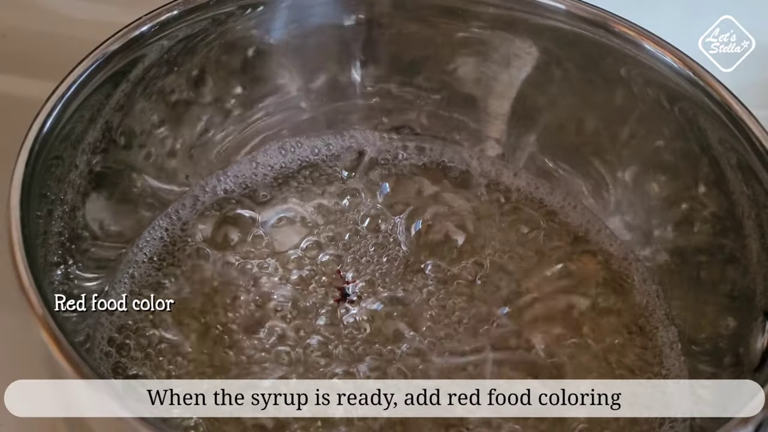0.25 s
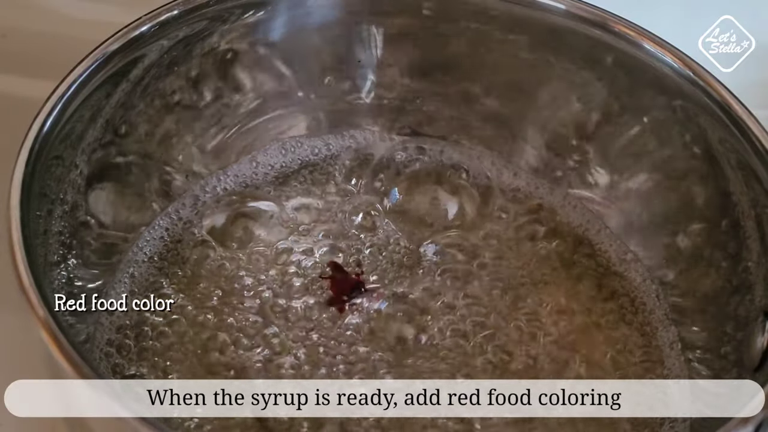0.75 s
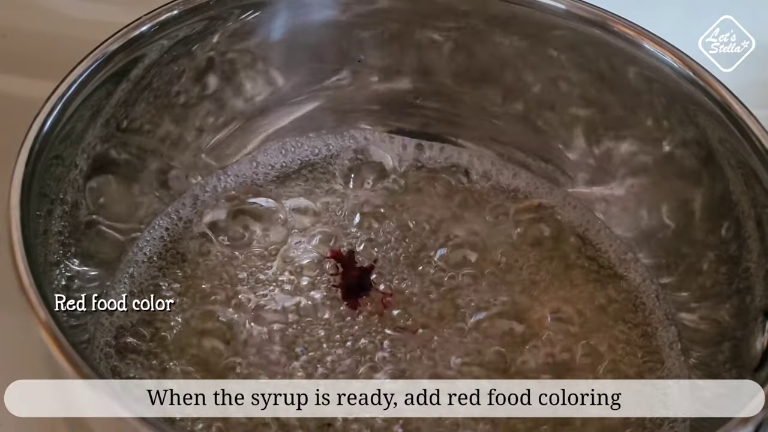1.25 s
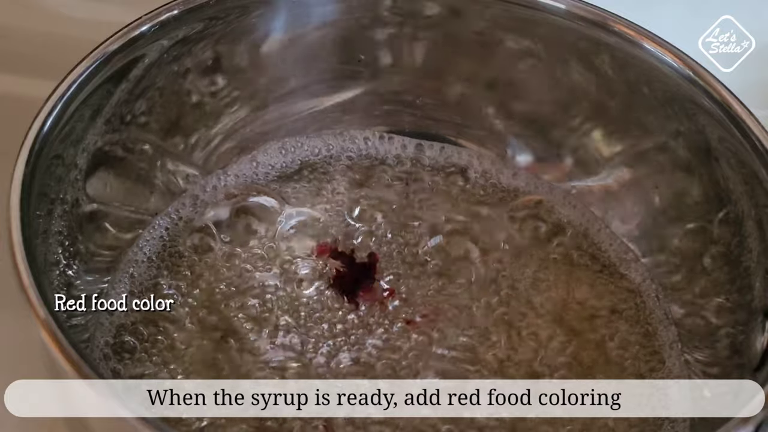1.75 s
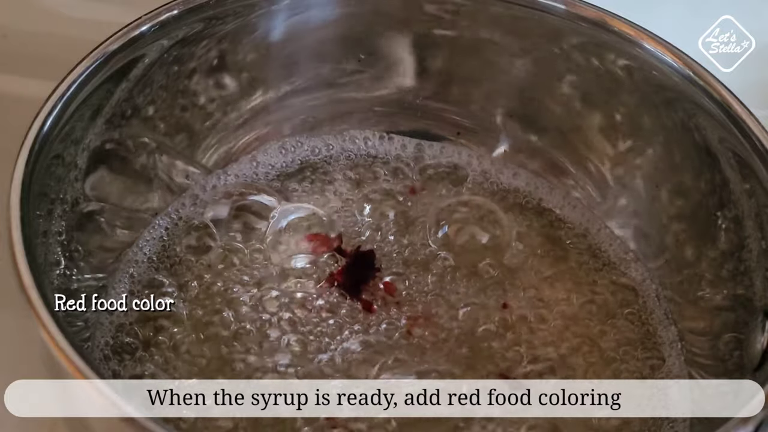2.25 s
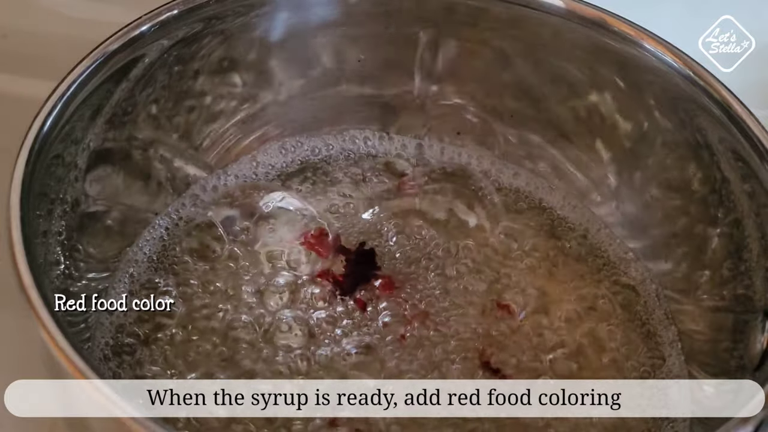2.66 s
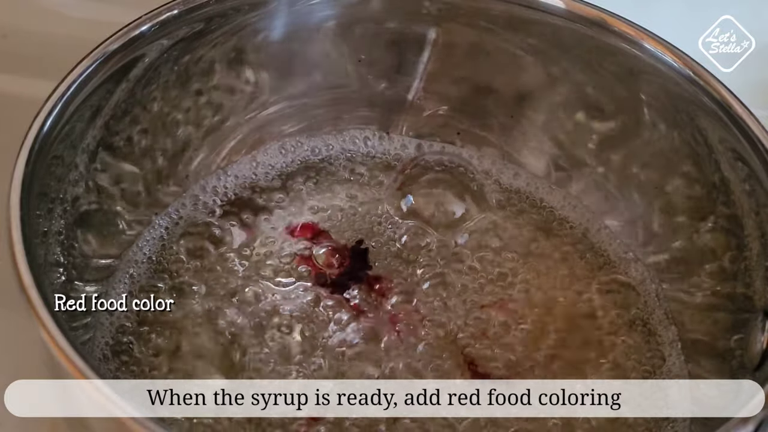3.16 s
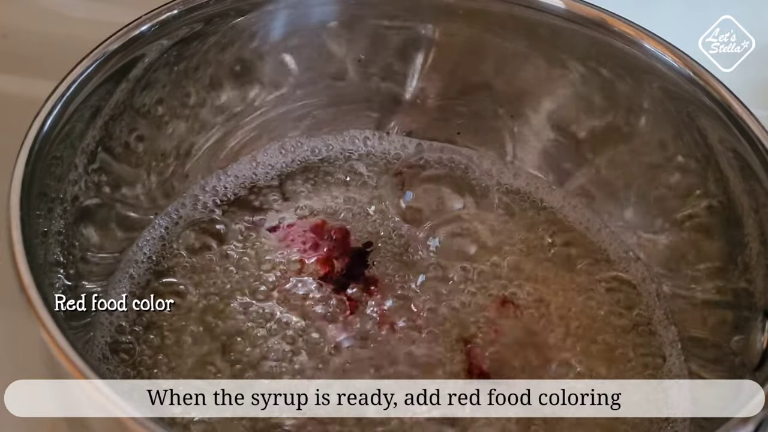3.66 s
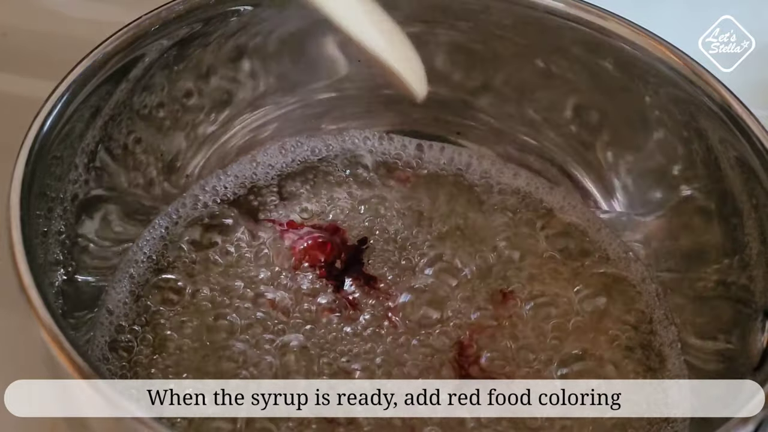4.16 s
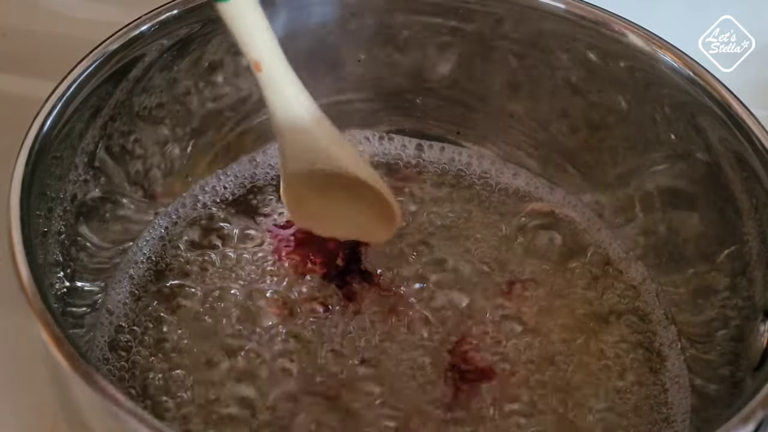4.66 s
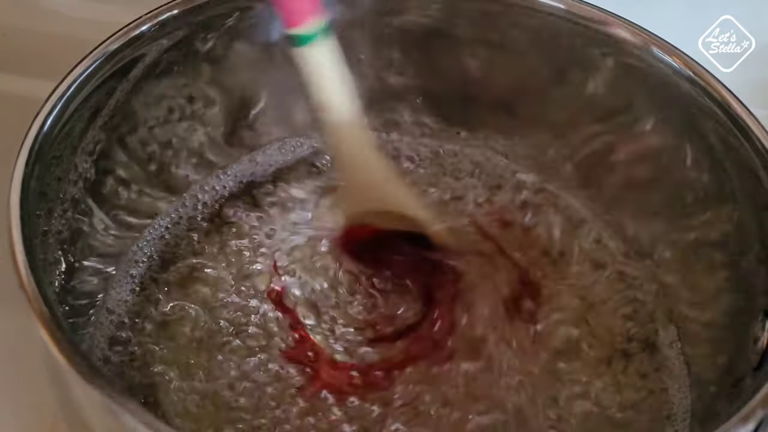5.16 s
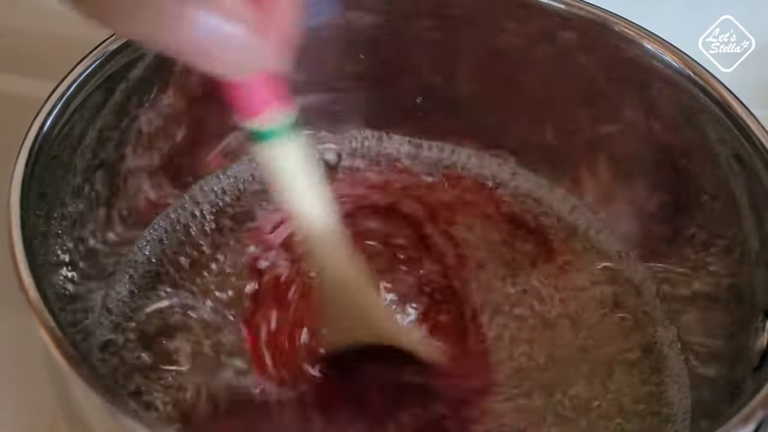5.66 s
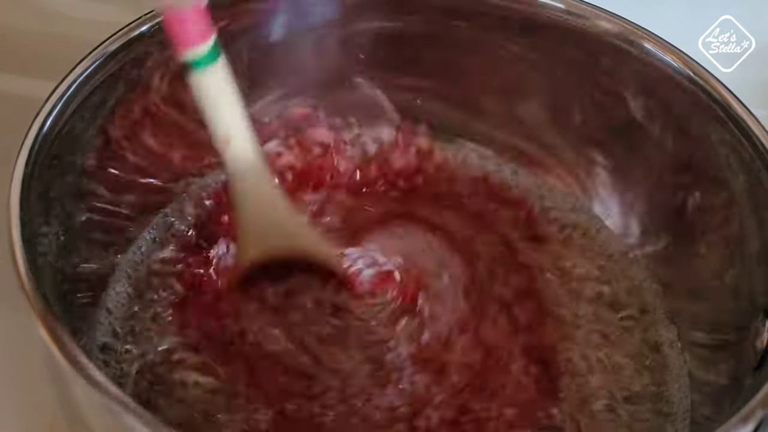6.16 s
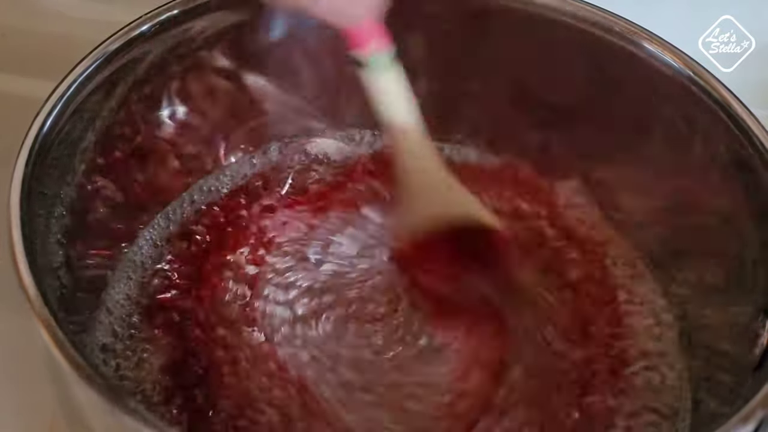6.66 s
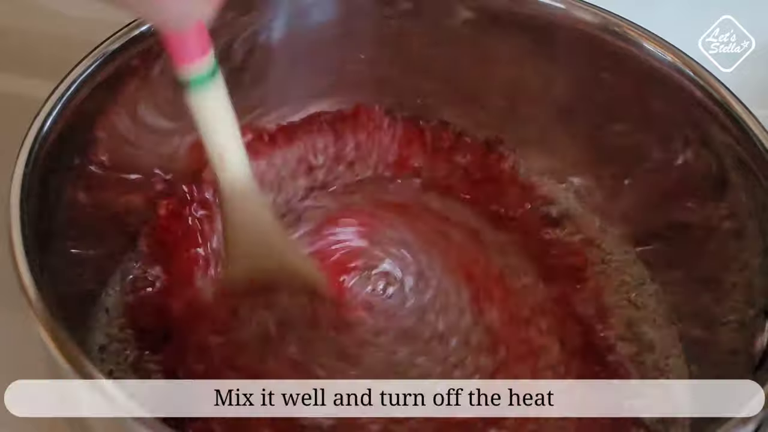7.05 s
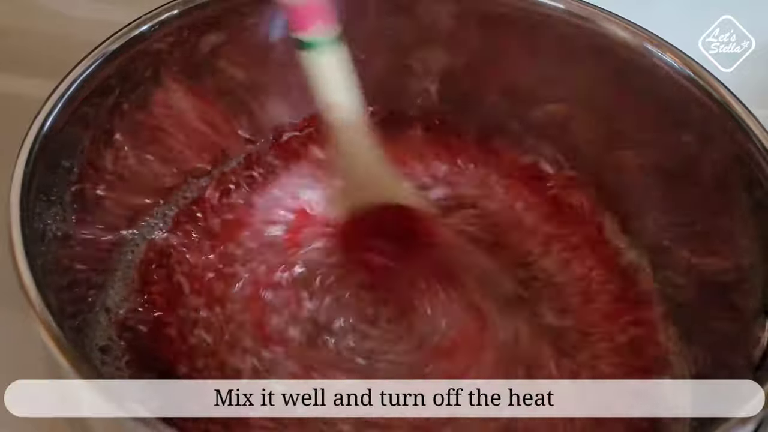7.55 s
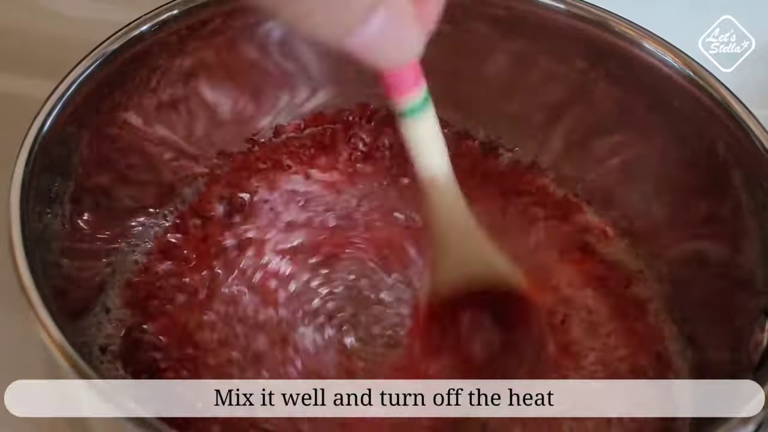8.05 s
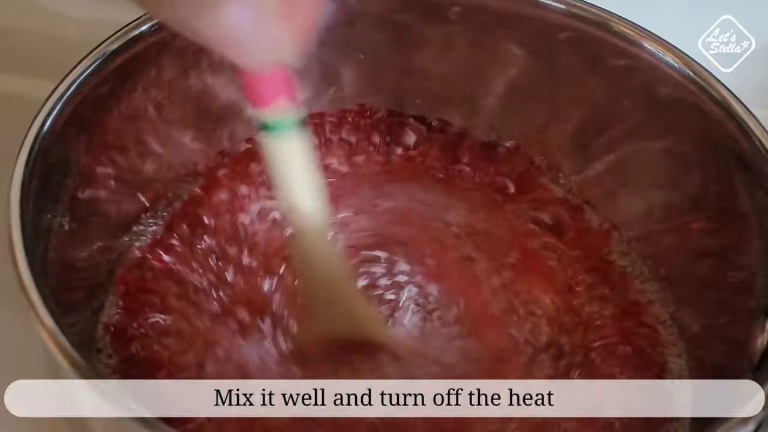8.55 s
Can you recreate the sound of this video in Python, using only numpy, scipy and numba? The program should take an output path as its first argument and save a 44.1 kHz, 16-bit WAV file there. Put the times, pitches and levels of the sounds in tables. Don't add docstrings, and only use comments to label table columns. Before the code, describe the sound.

Quiet sparse bubble ticks in a steel pot, a soft counter thud at three seconds, then wet sizzling gurgle as a spoon stirs.

```python
import sys
import numpy as np
from scipy import signal
from scipy.fft import rfft, irfft
from scipy.io import wavfile
from numba import njit

SR = 44100
rng = np.random.default_rng(int(sys.argv[2]) if len(sys.argv) > 2 else 0)


def to_wav(s):
    ch = np.atleast_2d(s).T
    pcm = np.round(np.clip(ch, -1, 1) * 32767)
    wavfile.write(sys.argv[1], SR, pcm.astype(np.int16))


def decibels_to_gain(level_db):
    exponent = np.asarray(level_db, float) / 20
    return 10 ** exponent


N = 388080

# (time [s], vigour [dB], lean towards fine bubbles [dB])
BOIL_COURSE = [(0.0, -67.5, -3), (0.4, -65.5, -3.5), (0.9, -68.5, -1.5), (2.0, -67.5, 0), (3.5, -66, -2.6),
               (5.1, -67, -0.2), (5.25, -53, 1), (5.7, -47, 3.5), (6.4, -49, 1), (7.5, -49.5, 1.33),
               (8.8, -50, 0.7)]
# (time [s], hum level [dB])
FAN_COURSE = [
    (0.0, -59),
    (2.1, -51),
    (3.01, -49.5),
    (3.11, -40),
    (3.21, -43.5),
    (3.8, -52.5),
    (5.39, -52.5),
    (5.86, -49),
    (7.89, -46),
    (8.8, -50),
]


def syrup():
    return seething() + pot_air(small_pops() + plops() + sloshes())


def seething():
    # (frequency [Hz], density [dB per Hz])
    fizz_sizes = [(4400, 6), (7000, 3.5), (10000, -3), (13500, -2), (17000, 5)]
    tick_sizes = [(1400, -16.5), (4000, -5), (9000, -5), (16500, -6)]
    simmer_sizes = [(1100, -3.5), (2500, -4), (5000, -7)]
    gurgle_sizes = [(220, -1), (500, 0.5), (1200, -3.5)]
    fizz_db, simmer_db, gurgle_db = boil_levels()
    surge = drift(20.0)
    fizz = swarm(fizz_db - 0.3, 2500, 9.3, 0.044, surge, size_db=4.5, clump_db=3.5,
                 pan_db=1.0, echo_db=0.5, colour=fizz_sizes)
    ticks = swarm(fizz_db - 2.5, 150, 15.7, 0.026, surge, size_db=2.0, clump_db=4.0,
                  pan_db=6.0, echo_db=-3.0, colour=tick_sizes)
    simmer = swarm(simmer_db - 0.3, 800, 7.4, 0.081, surge, size_db=2.5, clump_db=3.0,
                   pan_db=2.5, echo_db=-1.0, colour=simmer_sizes)
    gurgle = swarm(gurgle_db - 3.5, 1300, 14.7, 0.14, surge, size_db=2.0, clump_db=3.0,
                   pan_db=2.0, echo_db=-9.0, colour=gurgle_sizes)
    return fizz + ticks + simmer + gurgle


def boil_levels():
    # (time [s], hold [s], lift [dB], lean towards fine bubbles [dB])
    foam_rafts = [(0.38, 0.12, 6, 0.2), (0.632, 0.034, 2.5, 0.5), (0.795, 0.065, 10, 0.2),
                  (0.96, 0.18, 1.5, -2), (1.302, 0.17, 10.5, -1.7), (1.551, 0.1, 9.5, 0.5),
                  (1.743, 0.1, 7.5, -1.5), (1.857, 0.044, 3.5, -3.5), (2.126, 0.12, 11, 4.5),
                  (2.265, 0.15, 8, 1.5), (2.44, 0.24, 6, 3.5), (2.786, 0.015, -1, 13), (2.92, 0.077, 5, 2),
                  (3.508, 0.049, 5.5, -1), (3.623, 0.17, 3, 0.5), (3.77, 0.14, 5, 0.5),
                  (3.881, 0.23, 9.5, 4), (4.23, 0.077, 8, 0), (4.409, 0.14, 6.5, 4),
                  (4.546, 0.07, 4.5, 8.5), (4.63, 0.049, 7.5, 1.5), (4.777, 0.14, 9, 0.8),
                  (5.061, 0.028, 8, 1)]
    # (time [s], hold [s], lift [dB], lean towards fine bubbles [dB])
    spoon_strokes = [(5.185, 0.014, 4, 5.6), (5.32, 0.094, -5, 1), (5.51, 0.11, 2, 0.1),
                     (5.786, 0.07, 2, 1), (5.962, 0.12, 4, 0.4), (6.096, 0.12, 3.5, 0),
                     (6.444, 0.065, 4.5, 0.3), (6.544, 0.21, 1.5, 0.4), (6.776, 0.058, 6, 2.5),
                     (6.97, 0.12, 2, 0.5), (7.09, 0.16, 4.5, -0.6), (7.384, 0.072, 2.5, 0.2),
                     (7.572, 0.094, 4, 0), (7.691, 0.11, 5.5, -1.5), (7.875, 0.055, 3.5, 2),
                     (7.983, 0.081, 2, -2), (8.161, 0.015, 0, -0.5), (8.27, 0.05, 2.5, -2),
                     (8.44, 0.12, 5, 0.5)]
    # (time [s], hold [s], lift [dB], lean [dB])
    spoon_pause = (6.29, .11, -3.5, 2.5)
    rise_s, fall_s, depth = 0.015, 0.039, 0.76
    stirred_db = -52
    vigour, lean = in_time(BOIL_COURSE)
    t, lift, tilt = np.arange(N) / SR, np.zeros(N), np.zeros(N)
    for s, hold, lift_db, lean_db in foam_rafts + spoon_strokes + [spoon_pause]:
        corners = s + np.cumsum([0, rise_s, abs(hold - rise_s), fall_s])
        shape = depth * np.interp(t, corners, [0, 1, 1, 0])
        lift += lift_db * shape
        tilt += lean_db * shape
    coarse = vigour - lean - stirred_db
    fizz_db = vigour + lean + lift + tilt
    simmer_db = stirred_db + 1.02 * coarse + lift - tilt
    gurgle_db = stirred_db + 1.67 * coarse + lift - 1.8 * tilt
    return fizz_db, simmer_db, gurgle_db


def swarm(level_db, per_s, cycles, swell, surge, size_db, clump_db, pan_db, echo_db, colour):
    rate = per_s * decibels_to_gain(clump_db * (0.95 * surge + 0.4 * drift(25.0)))
    born = np.flatnonzero(rng.random(N) < rate / SR)
    pitch, size, place = rng.random((len(born), 3)).T
    lowest, highest = colour[0][0], colour[-1][0]
    hz = lowest * (highest / lowest) ** pitch
    uneven_db = size_db * np.minimum(-np.log(size + 1e-9), 4.0)
    db = uneven_db + at_hz(colour, hz) + 20 * np.log10(hz)
    rings = bursts(born / SR, db, hz, pan_db + 4.2 * (place - 0.5), cycles, 0.25, swell, 1.2e-4,
                   echo_db, t60=0.13, count=5)
    return decibels_to_gain(level_db) * rms_one(pot_air(rings))


def small_pops():
    # (time [s], peak level [dB], ring [Hz], left-right [dB])
    simmer_pops = [(0.5084, -42.5, 8300, 5), (1.1174, -44, 15000, 7.0), (1.3297, -33, 2970, -1),
                   (1.3413, -35, 11900, 3), (1.3818, -42, 2960, 4.5), (1.746, -41, 7900, 2.5),
                   (1.8068, -39.5, 6060, 1.0), (2.0296, -42, 8100, 2.5), (2.3062, -32.5, 8990, -2),
                   (2.38, -42, 7600, 2.0), (2.4972, -42, 15300, 7), (2.6062, -39.5, 4900, 15),
                   (2.6585, -45, 4230, 5), (2.9387, -39, 7000, 4), (2.982, -28.5, 14000, 8),
                   (3.0466, -35.5, 10600, 4), (3.145, -27, 15300, 6), (3.2181, -36, 6900, 1),
                   (3.236, -37.5, 9500, 9), (3.2938, -28.5, 14100, 9), (3.48, -34, 15200, 11),
                   (3.6686, -40, 11400, 8), (3.7905, -37, 15000, 7), (3.8457, -43, 12800, 8),
                   (3.9285, -37, 14900, 0.0), (4.4847, -29, 15300, 10), (4.5344, -34, 12200, 7),
                   (4.5553, -34, 7600, -1), (4.7718, -32.5, 5800, 1), (5.1375, -34.5, 6900, 1)]
    # (time [s], peak level [dB], ring [Hz], left-right [dB])
    stirred_pops = [(5.1853, -38, 10800, 11), (5.3784, -23, 15000, 5), (5.4232, -24, 7950, 1),
                    (5.455, -25.5, 11700, 3.5), (5.5308, -24, 15400, 1.5), (5.61, -19, 12800, 3.0),
                    (5.697, -27, 9650, 10), (5.7237, -22, 9200, 5), (5.803, -23, 11600, -2),
                    (5.867, -24, 12100, -1), (5.9239, -25, 10400, 8), (5.9886, -23.5, 12200, 4),
                    (6.0861, -26, 12200, -3), (6.1126, -22.5, 8200, 4.5), (6.3944, -29.5, 6100, -2),
                    (6.5575, -31, 14700, 10), (6.5914, -26, 11400, 10), (6.942, -31, 11900, 0),
                    (7.0813, -29, 13600, 8), (7.1699, -23, 7900, 6), (7.5025, -29, 8200, 6),
                    (7.5961, -27, 4100, 3.0), (7.6226, -24.5, 14100, 9), (7.727, -29.5, 7600, -2),
                    (8, -27.5, 9700, 2), (8.174, -33, 7900, 3), (8.273, -34, 5140, 4),
                    (8.329, -26.5, 7600, 3), (8.3713, -27, 7600, -16.5), (8.4751, -24.5, 10600, 1.5)]
    # (time [s], peak level [dB], ring [Hz], left-right [dB])
    other_pops = [(1.5579, -46, 3880, 4), (1.9584, -44.5, 7640, 8), (2.4528, -44, 6950, 3.0),
                  (2.5656, -45, 8000, 13), (2.794, -44, 3780, 8), (3.0749, -39, 2800, 3),
                  (3.1916, -38, 6720, -5), (3.3957, -41, 6850, 0), (3.6292, -41.5, 8040, 7),
                  (4.0495, -38, 6060, 2), (4.5855, -37, 14600, 5.5), (4.6757, -38.5, 7900, 6),
                  (4.8315, -40.5, 10900, 11), (4.9038, -45, 6660, -3), (4.9447, -42, 7250, -7),
                  (5.593, -28, 13500, 1), (6.1734, -29, 8100, 2.5), (6.792, -39, 8380, 3),
                  (6.979, -34, 3160, 13), (8.4208, -28, 13600, 2.5)]
    # (time [s], peak level [dB], ring [Hz], left-right [dB])
    more_simmer_pops = [(0.0434, -56.0, 13180.0, 11.0), (0.416, -49.0, 2930.0, 9.0), (0.424, -47, 2760.0, 9.0),
                        (0.4741, -42, 3790.0, 6), (0.583, -51, 6290.0, 6.0), (0.8137, -50, 3620.0, 1),
                        (0.8568, -43, 7150.0, -3.0), (1.0817, -46, 14470.0, 8), (1.3859, -44.0, 10770.0, 12),
                        (1.4232, -44, 3790.0, 9.0), (1.4664, -52.0, 3270.0, 10.0), (1.4865, -52.0, 2930.0, 8.0),
                        (1.6342, -49, 4480.0, 9.0), (1.859, -48, 2840.0, 10), (1.9119, -51, 9650.0, 6.0),
                        (1.9353, -57, 10850.0, 11.0), (1.9523, -56, 11020.0, 9.0),
                        (2.1116, -51.0, 12320.0, 11.0), (2.1379, -50, 10080.0, 7), (2.2759, -43, 3100.0, 9),
                        (2.4627, -47, 10250.0, 13.0), (2.7103, -45, 10340.0, 0.0),
                        (2.7997, -50.0, 11460.0, 9.0), (2.8073, -45, 11710.0, 10.0), (2.8888, -53, 5510.0, 6.0),
                        (3.0804, -33, 5340.0, 4.0), (3.2436, -38, 14380.0, 7.0), (3.7429, -51, 11460.0, 8.0),
                        (3.7751, -48.0, 10680.0, -2.0), (3.98, -45, 3880.0, -4.0), (4.1906, -45, 14900.0, 13),
                        (4.249, -46, 3010.0, 9.0), (4.2816, -46, 6700, -4.0), (4.3578, -50, 4070, 3.0),
                        (4.4344, -45.0, 14900.0, 12), (4.492, -42, 7920.0, 6), (4.5631, -42.0, 12490.0, 11),
                        (4.6077, -46.0, 11800.0, 7.0), (4.7798, -44, 3790.0, -2), (4.8112, -46, 3960.0, 11),
                        (4.8593, -43, 15500.0, 12), (4.9172, -47, 11970.0, 9.0), (5.0122, -49.0, 14640.0, 12.0),
                        (5.0435, -49, 3010.0, 5), (5.0813, -49, 11540.0, 8.0)]
    # (time [s], peak level [dB], ring [Hz], left-right [dB])
    more_stirred_pops = [(5.1897, -34, 10590.0, 9), (5.2038, -37.0, 13520.0, 12.0),
                         (5.217, -39.0, 10510.0, 8.0), (5.2851, -35, 14900.0, 10), (5.3212, -35, 10940.0, 4.0),
                         (5.3278, -33, 13700.0, 8), (5.3501, -41, 5000.0, 3.0), (5.3719, -35, 11970.0, 6.0),
                         (5.392, -26, 14990.0, 3.0), (5.4443, -29, 15330.0, 10), (5.474, -34.0, 13700.0, 8.0),
                         (5.496, -33.0, 14560.0, 0.0), (5.7347, -28.0, 12830.0, -5.0),
                         (5.9983, -24, 12400.0, 6.0), (6.0199, -28.0, 10590.0, -2.0),
                         (6.0768, -29, 11710.0, -6.0), (6.2206, -32.0, 13950.0, 10.0),
                         (6.2862, -33, 7150.0, -7.0), (6.2975, -29, 14300.0, -6.0), (6.311, -33, 10800, 13.0),
                         (6.4031, -37.0, 5770.0, 4.0), (6.477, -28.5, 11200, 8), (6.5661, -31.0, 13950.0, 12.0),
                         (6.6095, -29, 15070.0, 10), (6.7006, -31, 3190.0, 5), (6.8966, -31, 14990.0, 10.0),
                         (6.9086, -34.0, 12830.0, 5.0), (6.9552, -34.0, 11890.0, 9.0),
                         (7.2672, -31, 15420.0, 9.0), (7.3071, -34.0, 14990.0, 11.0),
                         (7.3465, -36.0, 12230.0, 8.0), (7.5326, -37, 4570.0, 10), (7.6418, -31, 5170.0, 5.0),
                         (7.6538, -31, 12660.0, 5.0), (7.794, -29.0, 14210.0, 7), (7.918, -33.0, 7750.0, 2.0),
                         (7.963, -33, 4480.0, 1.0), (7.969, -31, 11200.0, 5), (8.0461, -37.0, 11710.0, 6.0),
                         (8.1117, -36, 9130.0, 5.0), (8.1561, -42, 8270.0, 7.0), (8.2962, -36.0, 14990.0, 4.0),
                         (8.3133, -36.0, 7840.0, 5), (8.3214, -36, 3600, 5.0), (8.3558, -38, 12920.0, 8.0)]
    every_one = simmer_pops + stirred_pops + other_pops + more_simmer_pops + more_stirred_pops
    s, db, hz, pan_db = np.transpose(every_one)
    echo_t60_s, echo_reach_s = 0.024, 0.009
    pops = bursts(s + 6e-4, db + 13.0, hz, pan_db, 11.2 * np.sqrt(hz / 9000), 0.035, 0.2, 4e-5,
                  echo_db=-7.5, t60=echo_t60_s, count=16, reach_s=echo_reach_s)
    snaps = bursts(s + 0.0007, db + 3.0, hz * 0.76, pan_db, 4.3, 0.036, 0.054, 4e-5,
                   echo_db=-4.5, t60=echo_t60_s, count=10, reach_s=echo_reach_s)
    return pops + snaps


def plops():
    # (time [s], peak level [dB], ring [Hz])
    large_bubbles = [(0.806, -47, 1410), (1.329, -37, 1490), (2.306, -32.5, 2700), (4.009, -46, 720),
                     (5.112, -39, 1370), (5.383, -43, 730), (5.536, -41, 681), (5.588, -41, 789),
                     (5.628, -37, 773), (5.909, -35, 678), (5.886, -32.5, 1390), (5.965, -29, 720),
                     (5.992, -43, 470), (6.139, -38, 759), (6.226, -28, 1380), (6.285, -32, 1600),
                     (6.445, -47, 796), (6.499, -41, 799), (6.799, -37, 735), (6.847, -40, 697),
                     (7.043, -39, 1670), (7.089, -38, 736), (6.978, -51, 708), (7.169, -35.5, 480),
                     (7.17, -28, 850), (7.336, -43, 1620), (7.449, -41, 705), (7.585, -38, 430),
                     (7.709, -39, 770), (7.755, -34.5, 845), (7.722, -32.5, 720), (7.812, -40, 775),
                     (7.935, -44, 568), (7.998, -34, 740), (8.1, -44, 750), (8.036, -36, 570),
                     (8.154, -41, 493), (8.32, -40, 825), (8.273, -41, 729), (8.508, -45, 708),
                     (8.72, -44, 690)]
    s, db, hz = np.transpose(large_bubbles)
    return bursts(s + 0.00066, db + 10.5, hz, 5.5, 4.05, 0.02, 0.2, 4e-5, echo_db=-9, t60=0.11)


def sloshes():
    # (time [s], peak level [dB], ring [Hz])
    hollows = [
        (5.713, -44, 205),
        (5.885, -40, 214),
        (6.081, -42.5, 228),
        (7.209, -48, 196),
        (7.248, -43, 244),
        (7.601, -36, 430),
        (7.645, -45, 556),
        (8.028, -41, 216),
    ]
    s, db, hz = np.transpose(hollows)
    return bursts(s, db + 9.5, hz, 2.5, 8.2, 0.13, 0.15, 4e-5, echo_db=-6.5, t60=0.22)


def bursts(s, db, hz, pan_db, cycles, rise, swell, spread_s, echo_db, t60, count=8, reach_s=0.025):
    chance, out = rng.standard_normal((len(s), 2)), np.zeros((2, N))
    lead = 1.1e-4 + spread_s * chance[:, 0]
    late = rng.random((len(s), 2, count + 1)) ** 1.5 * reach_s + 6e-4
    late[:, :, 0] = 0
    gain = decibels_to_gain(echo_db - 60 * late / t60) * rng.choice([-1, 1], late.shape)
    gain[:, :, 0] = 1
    turn = np.repeat(2 * np.pi * hz / SR, count + 1)
    length = np.repeat(cycles * decibels_to_gain(1.83 * chance[:, 1]), count + 1)
    for side, sign in enumerate((1, -1)):
        arrival = (s - sign * lead / 2)[:, None] + late[:, side]
        at = np.round(arrival * SR).clip(0, N - 1).astype(np.int64)
        height = decibels_to_gain(db + sign * pan_db / 2)[:, None] * gain[:, side]
        add(out[side], at.ravel(), height.ravel(), turn, length, rise, swell)
    return out


@njit
def add(out, at, height, turn, cycles, rise, swell):
    for k in range(len(at)):
        life = cycles[k] * 2 * np.pi / turn[k]
        for i in range(min(int(life), len(out) - at[k])):
            u = i / life
            shape = np.exp(-6.9 * u) * (1 - np.exp(-u / swell))
            out[at[k] + i] += height[k] * shape * np.sin(turn[k] * i * (1 + rise * u))


def pot_air(x):
    # (frequency [Hz], width [Hz], lift [dB])
    air_modes = [(594, 31, 3.5), (771, 150, 7), (1505, 190, 7.5), (2113, 235, 4.5), (2530, 260, -2),
                 (3043, 210, 5), (3470, 140, -4), (3877, 215, 4.5), (7600, 1260, 3), (11600, 3300, 5)]
    hz = np.arange(N // 2 + 1) * SR / N
    response = 1
    for top, width, db in air_modes:
        detuning = (hz - top ** 2 / (hz + 1e-9)) / width
        response = response + (decibels_to_gain(db) - 1) / (1 + 1j * detuning)
    return irfft(rfft(x) * response, N)


def whistle():
    # (time [s], half length [s], frequency [Hz], level [dB])
    steam_jet = (2.185, .035, 7950, -61.0)
    s, half, hz, db = steam_jet
    shape = np.exp(-((np.arange(N) / SR - s) / half) ** 4)
    return decibels_to_gain(db) * shape * rms_one(band(rng.standard_normal((2, N)), hz - 200, hz + 200))


def thud():
    # (time [s], peak level [dB])
    blows = [
        (3.067, -16),
        (3.185, -30),
    ]
    # (frequency [Hz], at the blow [dB], at the rebound [dB], T60 [s], swell [s])
    counter_modes = [(135.4, -11, -17, 0.24, 0.012), (223.6, -15, -15, 0.47, 0.032),
                     (277, 8, -11, 0.072, 0.015), (294, -16, 6.5, 0.13, 0.011), (535, 1.5, -1, 0.13, 0.064),
                     (682, -15, -12, 0.096, 0.02), (812, -13, -4, 0.078, 0.021),
                     (1250, -24, -25, 0.093, 0.01), (1410, -22, -20, 0.093, 0.0069),
                     (1660, -22, -23, 0.074, 0.007)]
    # (frequency [Hz], density [dB per Hz], T60 [s])
    room_tail = [(60.5, -8.5, 1), (160, 2, 0.66), (270, 0, 0.64), (547, -10.5, 0.66), (1300, -22.5, 0.7),
                 (2300, -25.5, 0.48), (3500, -32, 0.5), (15000, -29, 0.18)]
    t, direct, tail = np.arange(N) / SR, 0, 0
    for k, (s, db) in enumerate(blows):
        since = np.maximum(t - s, 0)
        for hz, *strength_db, t60, swell in counter_modes:
            shape = decibels_to_gain(db + strength_db[k] - 60 * since / t60) * (1 - np.exp(-since / swell))
            direct = direct + shape * np.sin(2 * np.pi * hz * since)
    since = np.maximum(t - blows[0][0], 0)
    for hz, noise in noise_bands(55.2, count=17):
        decay_db = 60 * since / at_hz(room_tail, hz, axis=2)
        lumps_db = 2.7 * drift(26.0)
        tail = tail + decibels_to_gain(at_hz(room_tail, hz) - decay_db + lumps_db) * noise
    tail = decibels_to_gain(-14.0) * tail * (1 - np.exp(-since / 0.0031))
    return (direct + tail) * decibels_to_gain(np.array([[1.3], [-1.3]]))


def fan():
    # (multiple of the hum, level [dB])
    orders = [(1, 0.5), (2, -14.5), (3, -19)]
    # (frequency [Hz], density [dB per Hz])
    rumble_colour = [(13, -47), (22, -18), (81, 0.5), (130, -8.5), (185, -13.5), (240, -9.5), (550, -40),
                     (1100, -120)]
    hum_db, = in_time(FAN_COURSE)
    vigour, _ = in_time(BOIL_COURSE)
    rumble_db = -56.5 + 0.39 * (hum_db + 49.5) + 0.11 * (vigour + 60)
    rotation_hz = 75.1 + 0.378 * drift(2.96)
    phase = 2 * np.pi * np.cumsum(rotation_hz) / SR
    ear_phase = np.array([[0.12], [-0.12]])
    hum = sum(decibels_to_gain(db + 0.84 * k * drift(2.9)) * np.sin(k * phase + ear_phase) for k, db in orders)
    rumble = sum(decibels_to_gain(at_hz(rumble_colour, hz)) * noise for hz, noise in noise_bands(19.64, count=10))
    rumble = decibels_to_gain(rumble_db + 0.5) * rms_one(rumble) * decibels_to_gain(np.array([[0.3], [-0.3]]))
    return np.sqrt(2) * decibels_to_gain(hum_db) * hum + rumble


def hiss():
    # (frequency [Hz], density [dB per Hz])
    hiss_colour = [(350, 4), (1000, 1.5), (2500, -4), (5000, -5), (9000, -2.5), (16000, -12)]
    mixed = 0
    for hz, noise in noise_bands(360, count=11):
        flicker_db = 4.5 * drift(9.4)
        mixed = mixed + decibels_to_gain(at_hz(hiss_colour, hz) + flicker_db) * noise
    return decibels_to_gain(in_time(FAN_COURSE)[0] - 16.0) * rms_one(pot_air(mixed))


def noise_bands(low_hz, count):
    # (frequency [Hz], left-right likeness [-1 to 1])
    likeness = [(60, 1), (250, 0.67), (600, 0.13), (1650, -0.55), (4970, -0.23), (15000, -0.03)]
    white = rng.standard_normal((2, 2, N))
    for k in range(count):
        low = low_hz * 2 ** (k / 2)
        centre = low * 2 ** 0.25
        mid, side = band(white[k % 2], low, low * np.sqrt(2))
        alike = np.clip(at_hz(likeness, centre), 0, 1)
        yield centre, np.sqrt(1 + alike) * mid + np.sqrt(1 - alike) * side * [[1], [-1]]


def band(x, low_hz, high_hz):
    edges = [low_hz, min(high_hz, 0.45 * SR)]
    return signal.sosfilt(signal.butter(2, edges, "band", fs=SR, output="sos"), x)


def drift(rate):
    r = np.exp(-80 * np.pi * rate / SR)
    chance = rng.standard_normal(N // 40 + 2002)
    slow = signal.lfilter([1], [1, -2 * r, r * r], chance)[2000:]
    return np.interp(np.arange(N) / 40, np.arange(len(slow)), rms_one(slow))


def rms_one(x):
    return x / np.sqrt(np.mean(x ** 2) + 1e-20)


def in_time(rows):
    s, *columns = np.transpose(rows)
    return [np.interp(np.arange(N) / SR, s, c) for c in columns]


def at_hz(points, hz, axis=1):
    table = np.array(points)
    return np.interp(np.log(hz), np.log(table[:, 0]), table[:, axis])


def scene():
    return syrup() + whistle() + hiss() + fan() + thud()


def roll_off(x):
    return signal.sosfilt(signal.butter(12, 16990, fs=SR, output="sos"), x)


def record(dry):
    low_pass = signal.ellip(10, 0.5, 55, 15950, fs=SR, output="sos")
    return roll_off(signal.sosfilt(low_pass, dry))


dry = scene()
out = record(dry)
to_wav(out)
```